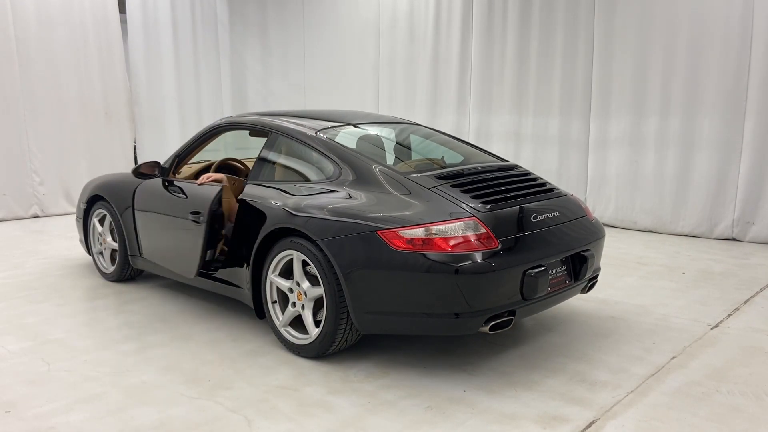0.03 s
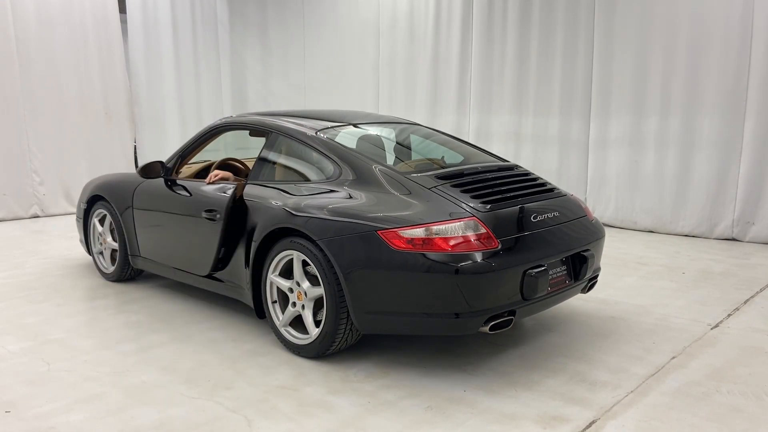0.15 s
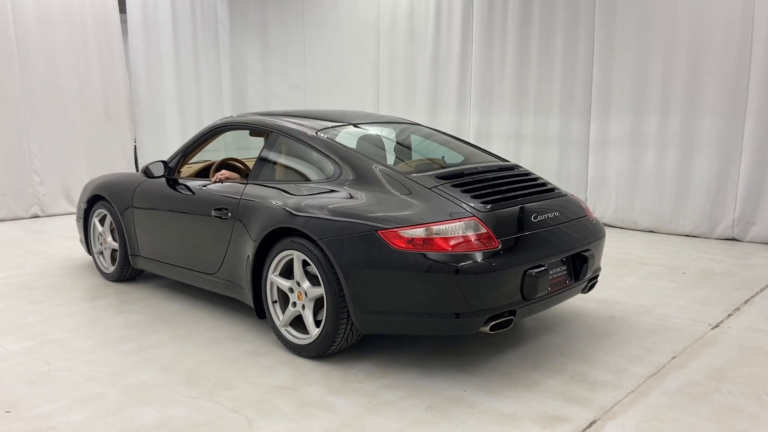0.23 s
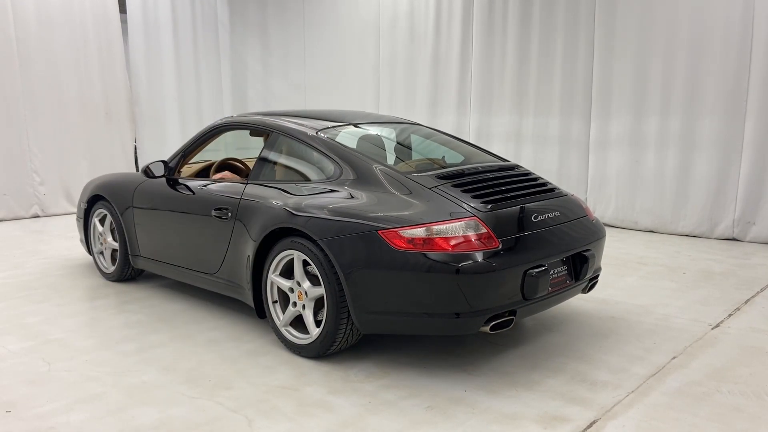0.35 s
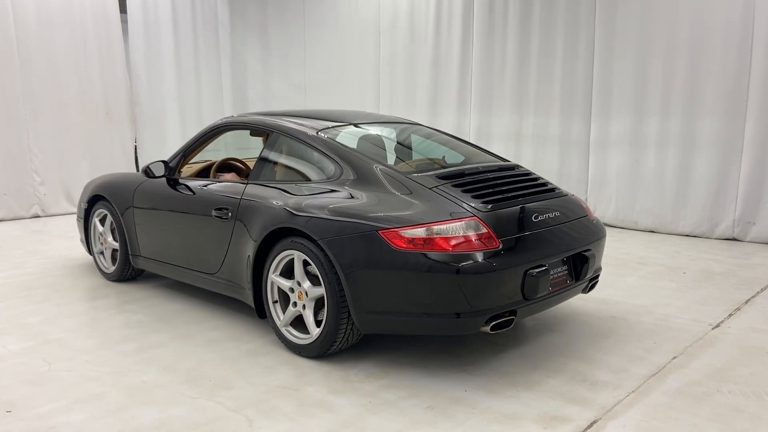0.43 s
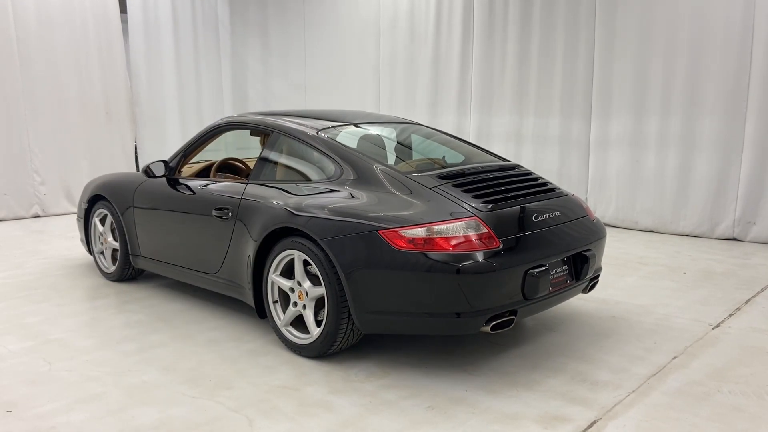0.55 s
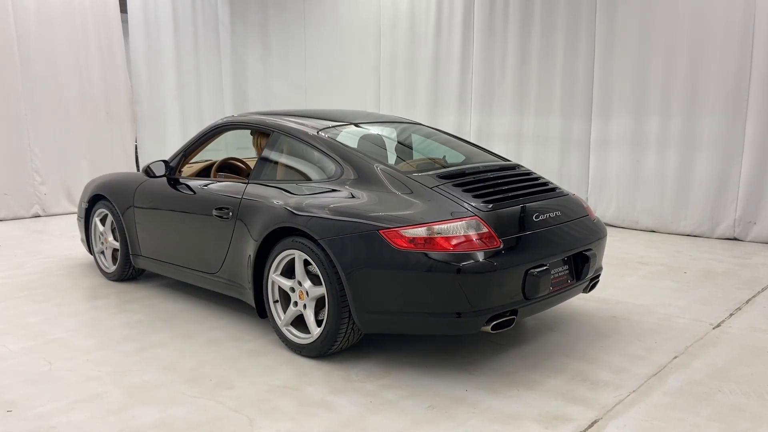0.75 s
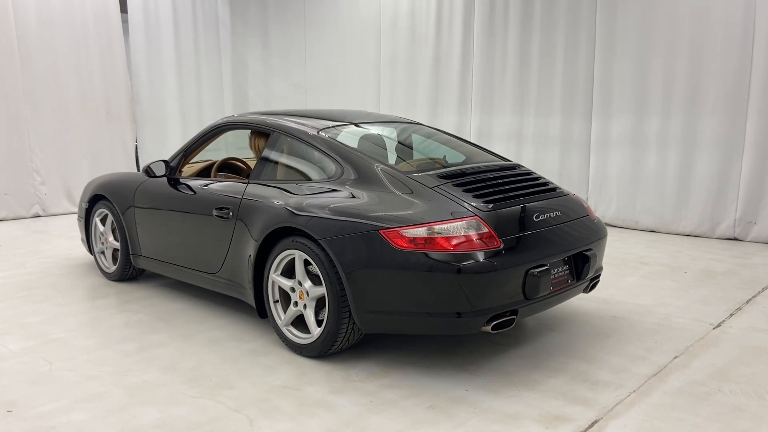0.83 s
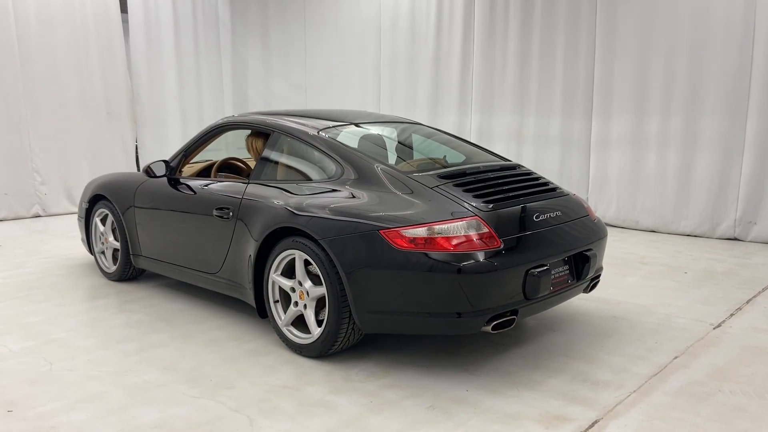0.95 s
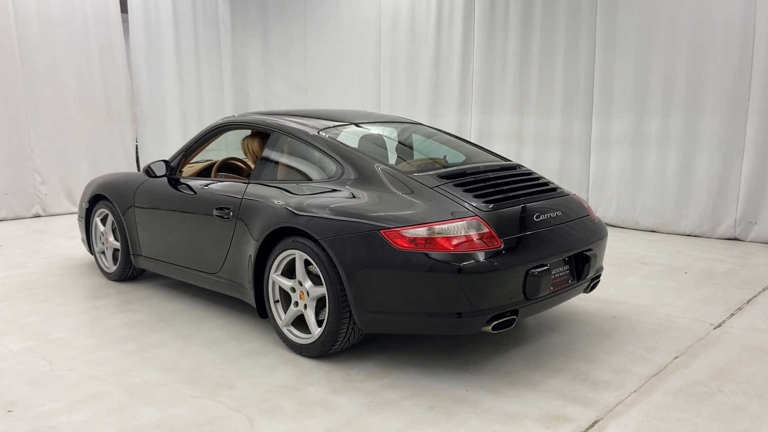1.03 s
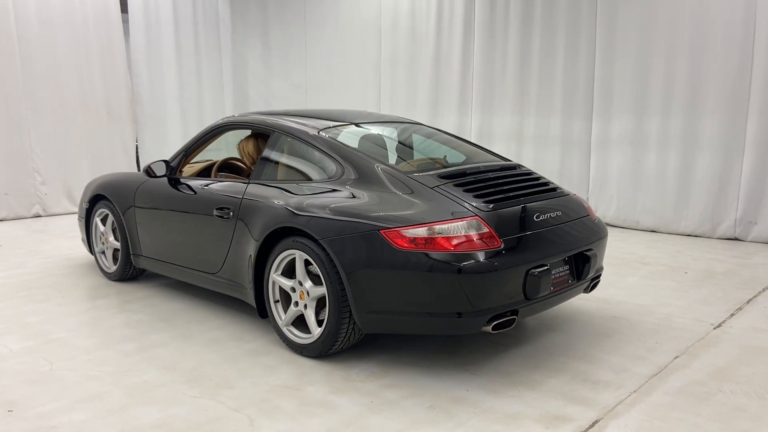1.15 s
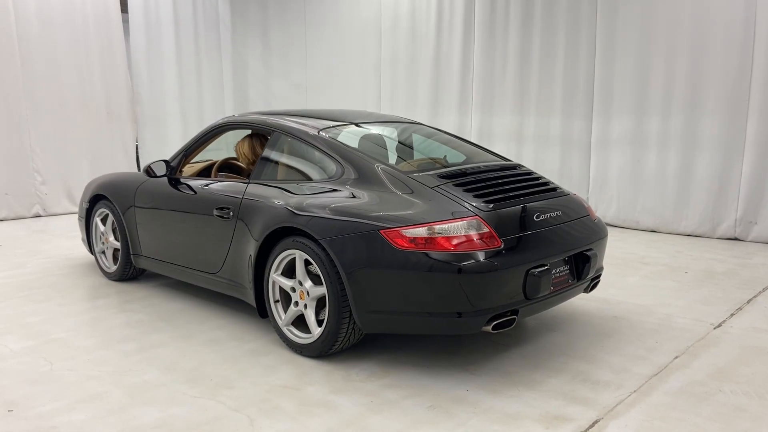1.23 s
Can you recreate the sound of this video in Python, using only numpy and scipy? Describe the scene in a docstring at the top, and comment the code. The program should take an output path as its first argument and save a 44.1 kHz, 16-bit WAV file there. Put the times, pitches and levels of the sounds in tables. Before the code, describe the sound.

A car door slams shut with one heavy thump in a quiet room.

```python
"""A car door slams a few metres away in a curtained studio. After a faint low tone from the swing,
the latch brushes the striker (the bar it hooks onto), the seal squashes, the latch snaps home and
the door rebounds. The door skin and the cabin thud, and steel parts ring briefly.
The room answers with a short echo over the hum and rush of ventilation."""
import sys
import numpy as np
from scipy import signal
from scipy.fft import rfft, irfft
from scipy.io import wavfile
from scipy.ndimage import map_coordinates

SR = 44100
rng = np.random.default_rng(int(sys.argv[2]) if len(sys.argv) > 2 else 0)


def wav_record(signal):
    """Record a signal, one row per channel, as 16-bit PCM in the file named by sys.argv[1]."""
    frames = np.transpose(np.atleast_2d(signal))
    bounded = np.clip(frames, -1, 1)
    # unit amplitude maps onto the largest positive 16-bit level
    quanta = np.round(bounded * 32767).astype(np.int16)
    wavfile.write(sys.argv[1], SR, quanta)


N = 57330
T = np.arange(N) / SR
ATTACK_S = 0.0015  # how quickly a rattle or the steel starts to sound

# Hard hits of latch and frame. Each row: start in seconds, level in dB, treble tilt in dB per octave,
# seconds for the rattle to fall to 37%, steel ring in dB, panel ring in dB.
LATCH_HITS = [(0.229, -24.5, 0.5, 0.013, -41.5, -40), (0.242, -21.5, 1.1, 0.015, -44, -30.5),
              (0.2568, -30.5, 1, 0.0073, -44.5, -41), (0.2776, -14, 1.87, 0.0069, -15.5, -19.5),
              (0.2873, -20, 1.5, 0.0064, -37, -39), (0.3075, -28, -1.5, 0.013, -48, -30.5),
              (0.3268, -30, 3, .018, -31.5, -33), (0.3480, -27.5, -2, 0.013, -51, -32),
              (0.3665, -26.5, -1, 0.0059, -48, -36.5)]
# Tone colour of the rattle, with a treble notch near 9000 Hz that is not the door's own.
# Each row: frequency in Hz, relative level in dB.
RATTLE_COLOUR = [(200, 8), (400, -4.5), (700, -6.5), (1000, -4.5), (1350, -14.5), (1950, -12), (2800, -16),
                 (3400, -24), (5400, -25), (7400, -30.5), (9000, -47.5), (11000, -31), (13000, -50.5),
                 (15500, -41.5)]
# How alike the rattle is left and right. Each row: frequency in Hz, likeness from -1 to 1 (the same).
RATTLE_LIKENESS = [(250, 0.49), (700, 0.5), (2000, -0.3), (4500, 0.5), (8000, 0.4), (12000, -0.023)]
# Where the door is heard. Each row: frequency in Hz, left minus right in dB.
DOOR_BALANCE = [(60, 4.9), (200, 2.1), (600, 5.7), (1200, 2.2), (2000, 2.2), (4500, 7), (8500, 1)]
# Pushes on seal, frame and cabin air, and the booms after them.
# Each row: start in seconds, pitch in Hz, level in dB, length in seconds.
DOOR_THUDS = [(0.2430, 130, -15.5, 0.047), (0.2346, 203.4, -22, 0.029), (0.24, 47, -25.5, .040),
              (0.2790, 900, -14.5, 0.003), (0.2890, 500, -11, 0.002), (0.2880, 147.6, -6.5, 0.017),
              (0.2798, 61.5, -13, 0.059), (0.3332, 69.3, -11.5, 0.034), (0.345, 195, -23.5, 0.043),
              (0.39, 108, -26, .06), (0.455, 76.5, -28.5, 0.064)]
# Ringing notes of the car's shell, the pawl (the latch's catch), the latch steel and the door panel.
# Each row: pitch in Hz, relative level in dB, seconds to fade by 60 dB.
SHELL_NOTES = [(56.6, -33, 0.43), (109.07, -20.5, 0.76), (141.1, -23.5, 0.69), (163.4, -27.5, 0.68),
               (196.4, -31.5, 0.36), (223.5, -28.5, 0.55)]
PAWL_NOTES = [(2225, -32, 0.059), (4230, -39, 0.03)]
STEEL_NOTES = [(1887.5, -3.5, 0.071), (1942, -2.5, 0.054), (1996, -6, 0.037), (2517, -12, 0.065),
               (2690, -10, 0.033), (2808, -9, 0.05), (5370, -16, 0.039)]
PANEL_NOTES = [(329.5, -12, 0.37), (343.1, -13, 0.3), (450, -10, 0.26), (538, -22, 0.18), (595, -18, 0.1),
               (620, -24, 0.64), (688, -13.5, 0.18), (689, -10, 0.11), (760, -16.5, 0.073),
               (793, -7.5, 0.24), (837, -16, 0.19), (895.5, -13.5, 0.2), (970, -14, 0.32), (1021, -12, .2)]
# Tone colour of the room's echo. Each row: frequency in Hz, relative level in dB.
ECHO_COLOUR = [(60, -14.5), (150, -11), (260, -3), (450, 0), (900, -2), (2000, -1), (5000, -6),
               (14000, -4.5)]
# Length of the echo. Each row: frequency in Hz, seconds to fade by 60 dB.
ECHO_FADE = [(100, 0.97), (500, 0.3), (2000, 0.37), (6000, 0.36), (14000, 0.052)]
# How alike the room's sound is left and right. Each row: frequency in Hz, likeness from -1 to 1.
ROOM_LIKENESS = [(60, 0.9), (170, 0.99), (320, 0.28), (1000, 0), (4000, 0.35), (10000, -.1)]
# How the room's sound leans to one side. Each row: frequency in Hz, left minus right in dB.
ROOM_BALANCE = [(60, 5.5), (200, 0), (500, 6.5), (1300, 1), (4400, 3.5), (8500, -1)]
# Fan and duct tones. Each row: pitch in Hz, relative level in dB.
FAN_TONES = [(84.2, -31.5), (195.4, -44.5), (415.4, -66.5), (528.5, -61.5), (826.3, -61.5), (1057, -64.5)]
# Tone colour of the background rush, with the same treble notch near 9000 Hz, not the ducts' own.
# Each row: frequency in Hz, relative level in dB.
RUSH_COLOUR = [(25, -21.5), (38, -9), (52, -1.5), (100, -2), (160, -0.5), (205, -11), (260, -7.5),
               (400, -22.5), (600, -25.5), (840, -23), (1480, -32.5), (2800, -39.5), (4700, -46.5),
               (7700, -54), (9000, -69), (11500, -58), (16000, -85)]
# Ventilation over time; the hum dips briefly. Each row: time in seconds, air gain in dB, hum gain in dB.
VENT_LEVELS = [(0, -1.5, -1), (.19, 0, -11), (.4, 1, -6), (.55, -0.5, -2.5), (0.8, -0.8, -1),
               (1.3, -0.07, -3)]


def latch_rattle(low_cut_hz=221):
    """Each hit shakes small parts into a burst of noise that dies fast."""
    hz, out = frequencies(), 0
    colour = gain(look_up(RATTLE_COLOUR, hz)) * pan(look_up(DOOR_BALANCE, hz))
    colour = colour / np.sqrt(1 + (low_cut_hz / hz) ** 8)
    for start, db, tilt_db, decay_s, _, _ in LATCH_HITS:
        age = since(start)
        rattle = noise(colour * gain(tilt_db * np.log2(hz)), look_up(RATTLE_LIKENESS, hz))
        out = out + gain(db) * rise(age, ATTACK_S) * np.exp(-age / decay_s) * rattle
    return out


def door_push(start, hz, db, seconds):
    """One push of the door makes a vibration that swells and dies."""
    age = since(start)
    swell = np.sin(np.pi * np.minimum(age / seconds, 1))
    return gain(db) * pan(look_up(DOOR_BALANCE, hz)) * swell * np.sin(2 * np.pi * hz * age)


def car_body():
    """Frame, seal and cabin give dull thuds, and the car's shell booms on after them."""
    thuds = sum(door_push(*thud) for thud in DOOR_THUDS)
    age = since(0.3)
    return thuds + rise(age, seconds=0.025) * ring(SHELL_NOTES, age)


def ringing_metal():
    """The pawl ticks on the striker at the first hit; every hit rings the latch steel and door panel."""
    out = ring(PAWL_NOTES, since(LATCH_HITS[0][0]))
    for start, _, _, _, steel_db, panel_db in LATCH_HITS:
        age = since(start)
        out = out + gain(steel_db) * rise(age, ATTACK_S) * ring(STEEL_NOTES, age)
        out = out + gain(panel_db) * rise(age, seconds=0.0047) * ring(PANEL_NOTES, age)
    return out


def ring(notes, age):
    """A struck part sounds all its notes at once, each fading at its own speed."""
    return sum(gain(db) * pan(look_up(DOOR_BALANCE, hz)) * fade(age, fade_s)
               * np.sin(2 * np.pi * hz * age) for hz, db, fade_s in notes)


def room_echo(sound, gap_s=0.00091, build_s=0.0061, gain_db=-4):
    """Many reflections blur into a tail that builds up, then dies at its own speed in each octave."""
    hz, age, tail = frequencies(), since(gap_s), 0
    reflections = rfft(room_noise(ECHO_COLOUR))
    for centre_hz in 2. ** np.arange(5, 15):
        octave = np.maximum(1 - np.abs(np.log2(hz / centre_hz)), 0)
        shape = rise(age, build_s) * fade(age, look_up(ECHO_FADE, centre_hz))
        tail = tail + irfft(reflections * octave, N) * shape / np.sqrt(np.sum(shape ** 2))
    mono = sound.mean(axis=0)[None]
    return signal.fftconvolve(mono, tail, axes=1)[:, :N] * gain(gain_db)


def ventilation(waver_db=0.6, air_gain_db=-35.5, left_delay_s=0.00023):
    """Wavering fan tones and a rush of air reach the left side a little later."""
    hum = 0
    for hz, db in FAN_TONES:
        strength = np.sqrt(2) * gain(db + waver_db * drift(rate_hz=2.1))
        hum = hum + strength * np.sin(2 * np.pi * hz * T + 0.12 * drift(rate_hz=5.7))
    times, air_db, hum_db = np.array(VENT_LEVELS).T
    air = gain(air_gain_db + np.interp(T, times, air_db)) * room_noise(RUSH_COLOUR)
    left, right = air + gain(np.interp(T, times, hum_db)) * hum * pan(db=3)
    late_left = map_coordinates(left, [(T - left_delay_s) * SR], mode="nearest")
    return np.array([late_left, right])


def room_noise(colour):
    """Noise that arrives from all over the room."""
    hz = frequencies()
    gains = gain(look_up(colour, hz)) * pan(look_up(ROOM_BALANCE, hz))
    return noise(gains, look_up(ROOM_LIKENESS, hz))


def drift(rate_hz):
    """A slow random wobble with a typical size of one."""
    return noise(np.exp(-(frequencies() / rate_hz) ** 2), likeness=0.67)[0]


def noise(colour, likeness):
    """Stereo noise of level one, with the given tone colour and likeness of left and right."""
    shared, opposite = rfft(rng.standard_normal((2, N)))
    shared, opposite = shared * np.sqrt(1 + likeness), opposite * np.sqrt(1 - likeness)
    stereo = irfft(np.array([shared + opposite, shared - opposite]) * colour, N)
    return stereo / np.sqrt(np.mean(stereo ** 2))


def since(start):
    """Seconds since an event, zero before it."""
    return np.maximum(T - start, 0)


def rise(age, seconds):
    """Climb from 0 towards 1, reaching 63% in the given time."""
    return 1 - np.exp(-age / seconds)


def fade(age, seconds):
    """Fall by 60 dB in the given time."""
    return np.exp(-np.log(1000) * age / seconds)


def gain(db):
    """Turn decibels into a multiplier."""
    return 10 ** (np.asarray(db) / 20)


def pan(db):
    """Left and right multipliers, with the left louder by db."""
    return gain(np.array([[1], [-1]]) * db / 2)


def look_up(table, hz):
    """Read between a table's rows, with octaves evenly spaced."""
    row_hz, values = np.array(table, float).T
    return np.interp(np.log(hz), np.log(row_hz), values)


def frequencies():
    """The frequency in Hz of each point in a spectrum, never below 1."""
    return np.maximum(np.arange(N // 2 + 1) * SR / N, 1)


def scene():
    """The door, its echo and the ventilation."""
    swing = door_push(start=0.035, hz=172, db=-33.5, seconds=0.17)
    blows = swing + latch_rattle() + car_body()
    ringing = ringing_metal()
    echo = room_echo(blows + gain(-8.5) * ringing)  # only part of the ringing feeds the room
    return blows + ringing + echo + ventilation()


def record(dry):
    """Cut away the highest treble, above 16000 Hz."""
    return signal.sosfilt(signal.ellip(8, .2, 80, 16000, fs=SR, output="sos"), dry)


dry = scene()
out = record(dry)
wav_record(out)
```